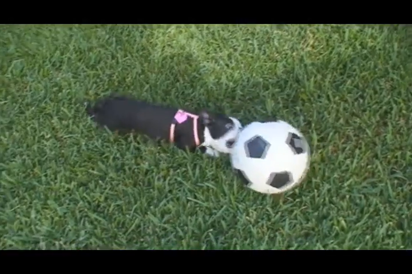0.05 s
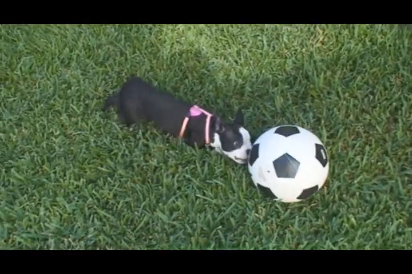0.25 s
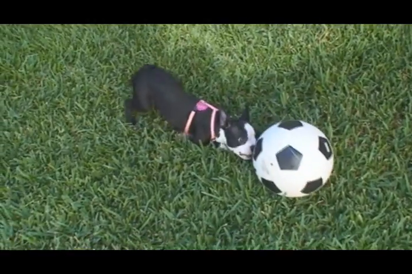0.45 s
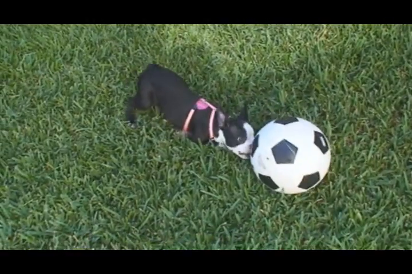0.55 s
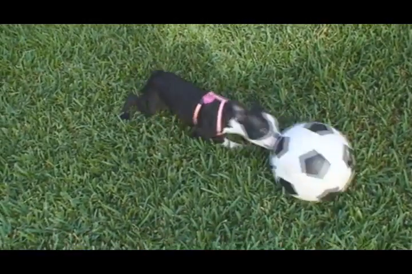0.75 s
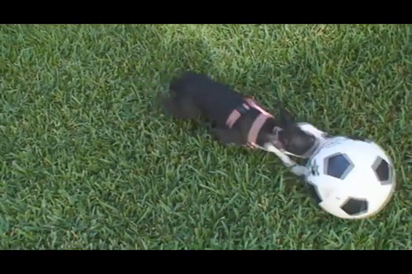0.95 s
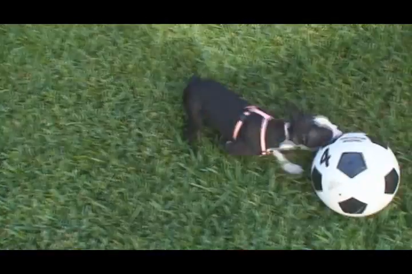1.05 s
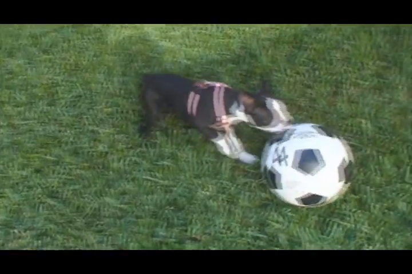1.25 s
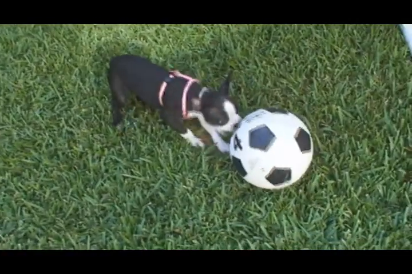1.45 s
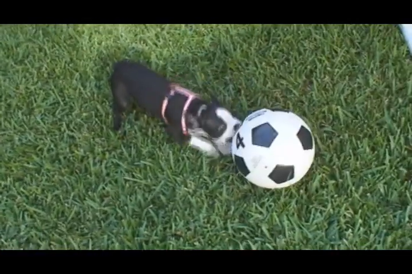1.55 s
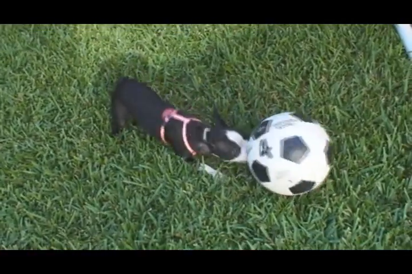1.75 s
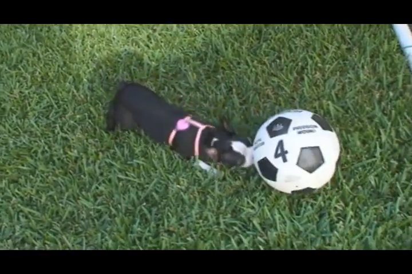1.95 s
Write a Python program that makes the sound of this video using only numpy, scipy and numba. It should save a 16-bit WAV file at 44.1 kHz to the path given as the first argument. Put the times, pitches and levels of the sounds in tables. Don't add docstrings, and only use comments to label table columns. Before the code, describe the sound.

A small puppy close by yaps sharply twice, then whines thinly; collar tags clink, grass rustles, and claws and nose tap a taut ball at the end, over faint traffic rumble in a back yard.

```python
import sys
import numpy as np
from scipy import signal
from scipy.fft import rfft, irfft, next_fast_len
from scipy.io import wavfile
from scipy.ndimage import uniform_filter1d, map_coordinates
from numba import njit

SR = 44100
rng = np.random.default_rng(int(sys.argv[2]) if len(sys.argv) > 2 else 0)


def file_out(sig):
    cols = np.atleast_2d(sig).T
    lim = np.clip(cols, -1, 1)
    pcm = np.round(lim * 32767).astype(np.int16)
    wavfile.write(sys.argv[1], SR, pcm)


def volts(x):
    e = np.asarray(x, float) / 20
    return 10 ** e


N = 88200


def unit(x):
    return x / np.sqrt(np.mean(x ** 2) + 1e-20)


def along(points, hz):
    f, v = np.transpose(points)
    return np.interp(np.log(hz + 1), np.log(f + 1), v)


def curves(rows):
    s, *cols = np.transpose(rows)
    return [np.interp(np.arange(N) / SR, s, c) for c in cols]


def wobble(rate):
    return map_coordinates(rng.standard_normal(N // 8), [np.arange(N) * rate / SR])


def sweep(hz):
    return 2 * np.pi * np.cumsum(hz) / SR


def filtered(x, response):
    m = next_fast_len(N + SR // 2)
    return irfft(rfft(x, m) * response(np.fft.rfftfreq(m, 1 / SR)), m)[..., :N]


def low_cut(f, corner_hz, order):
    low = 1j * f / corner_hz
    return (low / (1 + low)) ** order


def spread(pair, alike):
    def response(hz):
        turn = np.arccos(np.clip(along(alike, hz), -1, 1)) / 2
        return np.array([np.cos(turn), np.sin(turn)])

    mid, side = filtered(pair, response)
    return np.array([mid + side, mid - side])


def add(track, s, sound):
    part = track[round(s * SR):][:len(sound)]
    part += sound[:len(part)]


@njit
def resonate(x, turn, keep):
    y, state = np.zeros(len(x)), 0j
    for i in range(len(x)):
        state = keep * np.exp(1j * turn[i]) * state + x[i]
        y[i] = state.imag
    return y


THROAT_LOW_HZ = 1000
# (centre [Hz], width [Hz], level [dB])
THROAT_MODES = [(1954, 1020, 8), (2630, 620, 9), (3080, 443, 5), (4150, 1170, 0), (4500, 310, 4),
                (5240, 180, 0), (6540, 150, -60), (8440, 1640, -13.5), (10440, 570, -22.5)]


def throat(f, pocket_hz):
    peaks = 0
    for k, (centre, width, db) in enumerate(THROAT_MODES):
        peak = 1j * f * width / (centre ** 2 - f * f + 1j * f * width)
        peaks = peaks + (-1) ** k * volts(db) * peak
    gap = pocket_hz ** 2 - f * f
    pocket = (gap / (gap + 1j * f * 600)) ** 2
    return peaks * pocket * low_cut(f, THROAT_LOW_HZ, 2)


def burst(f):
    peak = 1 + volts(12) * np.exp(-((f - 6050) / 600) ** 2)
    return low_cut(f, 4270, 3) * peak / (1 + (f / 11500) ** 20)


def call(rows, body_db, rise_s, tires_db, burst_db, pocket_hz):
    hz, db, mouth_hz, rough, hum_db = curves(rows)
    rough, hz = np.clip(rough, 0, 1), uniform_filter1d(hz, size=400)
    start, voiced, fading, end = rows[0][0], rows[1][0], rows[-2][0], rows[-1][0]
    live = slice(round(voiced * SR), round(fading * SR))
    t = np.arange(N) / SR

    phase = sweep(hz * (1 + .06 * rough * wobble(350)))
    swing = volts(2.5 * wobble(45))
    pulses = np.zeros(N)
    for k, lag in enumerate(2 * np.pi * rng.random(15), 1):
        pulses += np.roll(swing, k * SR // 8) ** min(k / 4, 1) * np.cos(k * phase + lag)
    pulses = unit(pulses)
    breath = rng.standard_normal(N) * (1 + np.cos(phase))

    rattle, rattle_share = np.sin(sweep(118 * (1 + .25 * wobble(70)))), .6
    flutter = volts(7 * rough * (rattle_share * rattle + (1 - rattle_share) * wobble(150)))

    def source(breath_share):
        share = np.clip(breath_share, 0, 1)
        return flutter * (np.sqrt(1 - share) * pulses + np.sqrt(share) * 2 * breath)

    keep = np.exp(-np.pi * 230 / SR)
    turn = 2 * np.pi * mouth_hz / SR
    ring = resonate(resonate(source(.5 * rough), turn, keep), turn, keep ** 2)
    ring = filtered(ring, lambda f: low_cut(f, THROAT_LOW_HZ, 4))

    wide = np.exp(-((t - start) / .013) ** 2)
    opened, settled = filtered(source(.55 * rough ** .5 + .5 * rough),
                               lambda f: np.array([throat(f, 7200), throat(f, pocket_hz)]))
    upper = wide * opened + (1 - wide) * settled
    open_db = 9 * np.log2(mouth_hz / 1300)
    upper_db = body_db + 2.5 - tires_db * np.clip(t - start, 0, 1) + open_db
    rise = 1 - np.exp(-np.maximum(t - start, 0) / rise_s)
    voice = ring / ring[live].std() + volts(upper_db) * upper / upper[live].std() * rise

    voice += volts(burst_db - 60 * np.maximum(t - voiced, 0) / .092) * unit(filtered(breath, burst))
    hum = volts(hum_db + 2.0) * np.sin(sweep(hz))
    gate = (t > start) * np.clip((end + .0019 - t) / .0039, 0, 1)
    return gate * (volts(db) * voice + hum)


# (time [s], pitch [Hz], effort [dB], mouth resonance [Hz], roughness [0-1], nose hum [dB])
FIRST_YAP = [(.198, 500, -40, 1520, .03, -44), (.207, 570, -15, 1720, .03, -33),
             (.222, 726, -15, 1600, .15, -32), (.234, 840, -16, 1450, .45, -33),
             (.243, 680, -15, 1350, .45, -50), (.268, 625, -19, 1260, .5, -60),
             (.297, 505, -21, 1010, .3, -62), (.313, 440, -35, 850, .5, -62), (.33, 400, -65, 800, .6, -62)]
SECOND_YAP = [(.812, 570, -30, 1600, .15, -40), (.8165, 640, -16, 1950, .1, -33),
              (.829, 760, -17, 1600, .18, -34), (.842, 770, -18, 1450, .55, -42),
              (.872, 640, -18, 1290, .45, -56), (.9, 600, -22, 1200, .65, -62),
              (.915, 545, -17, 1080, .15, -64), (.926, 500, -33, 950, .5, -64),
              (.955, 420, -55, 800, .6, -64)]
WHINE_CALL = [(1.093, 495, -56, 1350, .4, -66), (1.104, 495, -41, 1330, .35, -52),
              (1.126, 540, -34, 1280, .12, -54), (1.154, 638, -27, 1270, .06, -62),
              (1.176, 585, -27, 1170, .07, -55), (1.203, 498, -32, 1010, .12, -51),
              (1.213, 510, -43, 1050, .6, -53), (1.238, 535, -38, 1080, .7, -54),
              (1.3, 580, -60, 1180, .9, -64)]
# (rise [s], tiring [dB/s], air burst [dB], settled pocket [Hz])
CALL_THROATS = [
    (0.0099, 40, -17.5, 5640),
    (0.0044, 79, -11, 6050),
    (0.012, 20, -16.5, 5300),
]
# (time [s], length [s], pitch [Hz], level [dB])
GULP_HUMS = [
    (.327, .04, 600, -41),
    (.362, .035, 430, -51),
    (.952, .042, 570, -45),
]


def puppy():
    first, second, last = CALL_THROATS
    yaps = call(FIRST_YAP, -4, *first) + call(SECOND_YAP, -4, *second)
    out = volts(5) * yaps + volts(1) * call(WHINE_CALL, -8, *last)
    for s, length, hz, db in GULP_HUMS:
        t = np.arange(round(length * SR)) / SR
        tone = np.sin(2 * np.pi * (hz - 3800 * t / 2) * t)
        add(out, s, volts(db + 6.5) * np.sin(np.pi * t / length) * tone)
    return out


# (time [s], level [dB], pitch [Hz])
CLAW_TICKS = [(1.6397, -40, 2350), (1.6462, -31, 1930), (1.6705, -42, 1900), (1.87, -38, 1870),
              (1.9618, -35.5, 1250), (1.9663, -37, 1510), (1.986, -33.5, 1710), (1.989, -39.5, 1600),
              (1.992, -30.5, 1694), (1.9972, -28.5, 1610)]
# (time [s], level [dB], pitch [Hz])
NOSE_THUMPS = [
    (1.9552, -42, 380),
    (1.9625, -39, 403),
    (1.9889, -37, 460),
    (1.9945, -35, 425),
]


def ball():
    out, t = np.zeros(N), np.arange(SR // 20) / SR
    for s, db, hz in CLAW_TICKS:
        noise = rng.standard_normal(len(t))
        scuff = unit(signal.lfilter(*signal.butter(2, [hz * .83, hz * 2.1], "band", fs=SR), noise))
        envelope = volts(db - 60 * t / .01) * (1 - np.exp(-t / .00029))
        add(out, s, envelope * (np.sin(2 * np.pi * hz * t) + volts(-10.5) * scuff))
    for s, db, hz in NOSE_THUMPS:
        add(out, s, volts(db - 60 * t / .038) * np.sin(2 * np.pi * hz * t))
    return out


# (pitch [Hz], t60 [s])
TAG_MODES = [(4700, .03), (7000, .06), (10170, .035)]
# (time [s], low mode level [dB], middle mode level [dB], high mode level [dB])
TAG_CLINKS = [
    (0.461, -73, -49.5, -53),
    (1.305, -70.5, -46, -57),
    (1.499, -53, -52, -41.5),
    (1.757, -78, -60, -73),
    (1.955, -75, -59, -64),
]


def tags():
    out, t = np.zeros(N), np.arange(SR // 5) / SR
    for s, *levels in TAG_CLINKS:
        ring = sum(volts(db - 60 * t / t60) * np.sin(2 * np.pi * hz * t)
                   for db, (hz, t60) in zip(levels, TAG_MODES))
        add(out, s, ring * (1 - np.exp(-t / .00019)))
    return out


# (frequency [Hz], level [dB])
NEAR_BOUNCE = [(500, -19), (1500, -14), (4500, -16), (9000, -8.5), (12000, -28)]


def nearby(x):
    delay, size = .004 * rng.random(6), rng.standard_normal(6)
    size = size / np.linalg.norm(size)

    def response(hz):
        return volts(along(NEAR_BOUNCE, hz)) * (size @ np.exp(-2j * np.pi * np.outer(delay, hz)))

    side = filtered(x, response)
    return np.array([side, -side])


# (frequency [Hz], t60 [s])
YARD_DECAY = [(400, 0.97), (1200, 0.32), (2500, 0.44), (5000, 0.26), (10000, 0.37)]


def yard(x):
    hz, t, z = signal.stft(rng.standard_normal((2, SR // 2)), SR, nperseg=256)
    bright_db = 2 * np.log2(np.clip(hz, 500, 4000) / 1200)[:, None]
    decay_db = -60 * t / along(YARD_DECAY, hz)[:, None]
    tail = signal.istft(z * volts(decay_db + bright_db), SR, nperseg=256)[1]
    tail = tail / np.linalg.norm(tail[0]) * 1.153
    late = np.pad(x, (round(.008 * SR), 0))[None]
    return spread(signal.fftconvolve(late, tail, axes=1)[:, :N], [(1000, .71)])


# (time [s], length [s], pitch [Hz], level [dB])
BIRD_NOTES = [
    (.64, .13, 3200, -61),
    (1.81, .11, 3300, -63),
    (1.79, .05, 4100, -63),
    (1.77, .04, 5700, -69),
]


def bird():
    out = np.zeros(N)
    for s, length, hz, db in BIRD_NOTES:
        n = round(length * SR)
        t = np.arange(n) / SR
        pitch = hz * (1 - .326 * t + .025 * wobble(402)[:n])
        level = volts(db + 5 * wobble(65)[:n]) * np.sin(np.pi * t / length) ** .5
        add(out, s, level * np.sin(sweep(pitch)))
    return out


def closed(points):
    ends = [(points[0][0] / 2, -70)] + list(points) + [(points[-1][0] * 1.1, -90)]
    return lambda hz: volts(along(ends, hz))


# (frequency [Hz], left-right likeness [-1 to 1])
AIR_LIKENESS = [(50, 0.93), (300, 0.94), (1500, 0.43), (5000, 0.59), (10000, .5)]


def rush(spectrum, patchy_db):
    z = signal.stft(rng.standard_normal((2, N)), nperseg=512)[2]
    field = uniform_filter1d(rng.standard_normal(z.shape[1:]), size=6, axis=0)
    field = uniform_filter1d(field, size=10, axis=1)
    pair = signal.istft(z * volts(patchy_db * unit(field)), nperseg=512)[1][:, :N]
    return unit(spread(filtered(pair, closed(spectrum)), AIR_LIKENESS))


# (frequency [Hz], level [dB per Hz])
GRASS_COLOUR = [(710, 7), (1200, 1), (1860, -2), (2770, -4), (3660, -4.5), (4000, -4.5), (9490, -10),
                (12200, -15), (15900, -73), (22000, -120)]
# (time [s], length [s], level [dB])
GRASS_STIRS = [
    (-.1, 0.63, -57.5),
    (0.553, 0.18, -57.5),
    (1.157, 0.24, -63),
    (1.577, 0.13, -54),
    (1.867, 0.055, -49),
]


def grass():
    t = np.arange(N) / SR
    stir = volts(-60.5)
    for s, length, db in GRASS_STIRS:
        stir = stir + volts(db) * np.clip(np.minimum(t - s, s + length - t) / .084, 0, 1)
    return stir * volts(wobble(33.0)) * rush(GRASS_COLOUR, patchy_db=-.5)


# (frequency [Hz], level [dB per Hz])
TRAFFIC_COLOUR = [(13, -43), (22, -10.5), (91, -3), (186, -7.5), (212, -8.5), (373, -4.5), (454, -8.5),
                  (799, -12.5), (4000, -29.5), (5200, -50), (8800, -120)]


def traffic():
    return volts(-47.5 - 5.0 + 1.2 * wobble(7.93)) * rush(TRAFFIC_COLOUR, patchy_db=0.0)


# (time [s], firing rate [Hz], level [dB])
ENGINE_IDLE = [
    (0, 87.85, -61),
    (.7, 78.3, -60.5),
    (1.2, 90.6, -70),
    (1.5, 91.1, -56),
    (1.7, 96.5, -59.5),
    (2, 93, -48),
]
# (multiple of firing rate, level [dB])
ENGINE_HARMONICS = [(1, 0), (2, -13), (3, -6), (3.5, -7)]


def engine():
    hz, db = curves(ENGINE_IDLE)
    phase = sweep(hz * (1 + .05 * wobble(16)))
    hum = sum(volts(db + level + 3.5 * wobble(5.92)) * np.sin(k * phase) for k, level in ENGINE_HARMONICS)
    return hum * volts([[.7], [-.7]])


def scene():
    near = puppy() + tags() + ball()
    pan_db, = curves([(.25, -0.27), (.5, 1.6), (.85, -1.1), (1.2, -0.44), (2, 1.3)])

    def tilt(hz):
        lean_db = along([(500, 0.88), (1500, -1.52), (4000, -0.092), (9000, -0.41)], hz)
        return volts(np.outer([1, -1], lean_db))

    direct = filtered(near * volts(np.outer([.5, -.5], pan_db)), tilt)
    far = bird()
    background = (grass() + traffic() + engine()) * volts([[.45], [-.45]])
    return direct + nearby(near) + volts(-13.5) * yard(near + 3 * far) + far + background


# (frequency [Hz], level [dB])
DROPOUT_FLOOR = [(5300, -130), (5600, -98), (6250, -98), (6600, -112), (9800, -112), (10400, -100),
                 (11500, -96), (12300, -99)]


def starve(x, duck_db):
    both = np.array([x[0] + x[1], x[0] - x[1]]) / 2
    hz, t, z = signal.stft(both, SR, nperseg=1024)
    band_db = 10 * np.log10(np.abs(uniform_filter1d(np.abs(z) ** 2, size=7, axis=1)) + 1e-20)
    need_db = along(DROPOUT_FLOOR, hz)[:, None] + 4.95 * np.interp(t * SR, np.arange(N), duck_db)
    mid, side = signal.istft(z * (band_db > need_db), nperseg=1024)[1][:, :N]
    return np.array([mid + side, mid - side])


def band_limit(x):
    return signal.sosfilt(signal.butter(12, 12360, fs=SR, output="sos"), x)


def record(dry):
    level_db = 10 * np.log10(np.abs(uniform_filter1d((dry ** 2).mean(0), size=300)) + 1e-12)
    ramp = 18 * np.arange(N) / SR
    duck_db = np.maximum.accumulate(.25 * np.maximum(level_db + 30, 0) + ramp) - ramp
    x = dry * volts(-duck_db)
    x = x / (1 + np.abs(x / .56) ** 4) ** (1 / 4)
    x = filtered(x, lambda hz: hz < 12300)
    return band_limit(starve(x, duck_db))


dry = scene()
out = record(dry)
file_out(out)
```